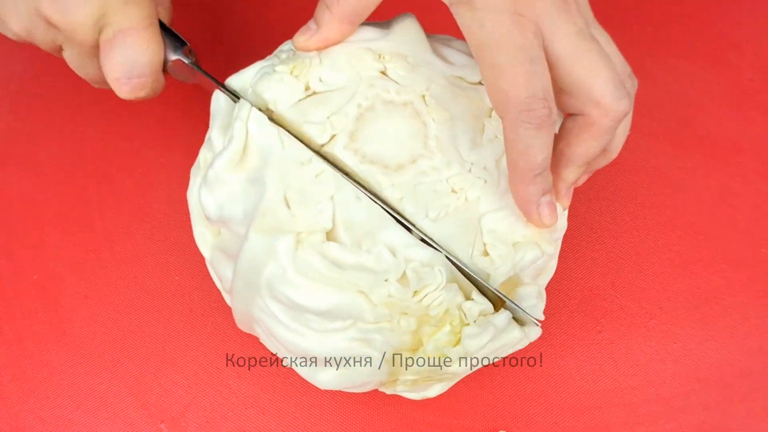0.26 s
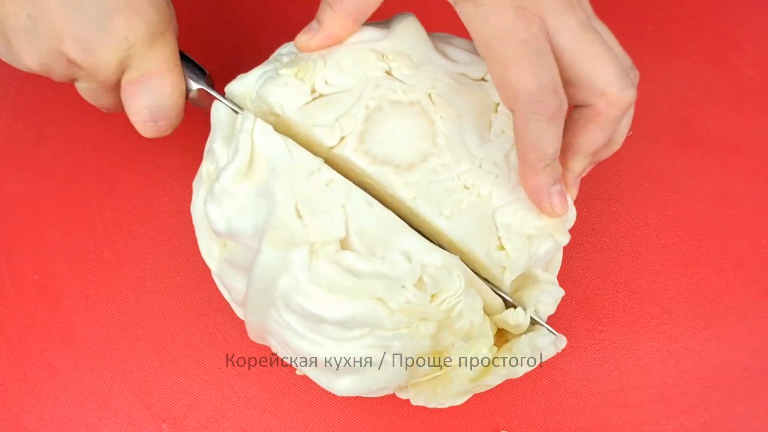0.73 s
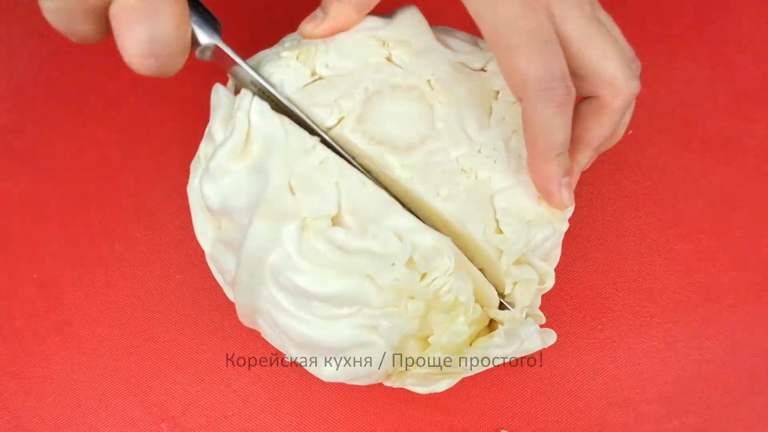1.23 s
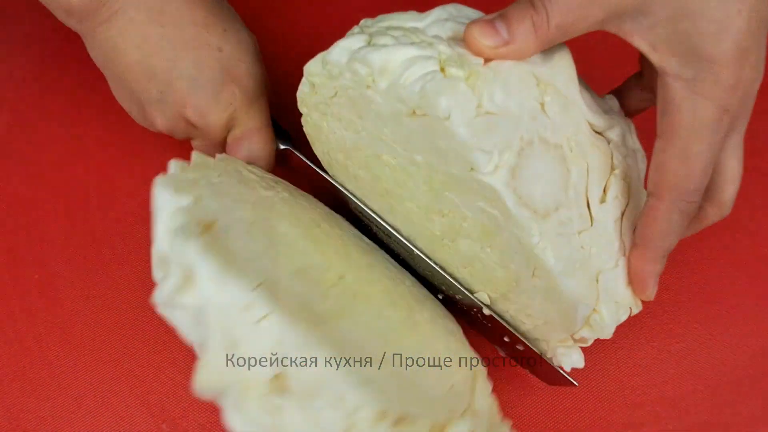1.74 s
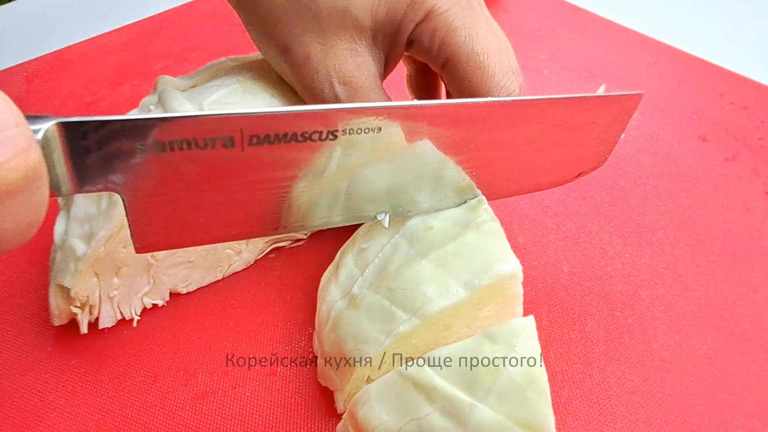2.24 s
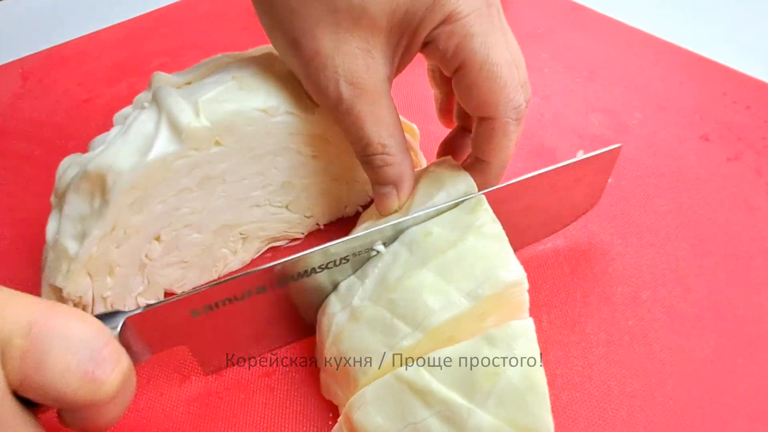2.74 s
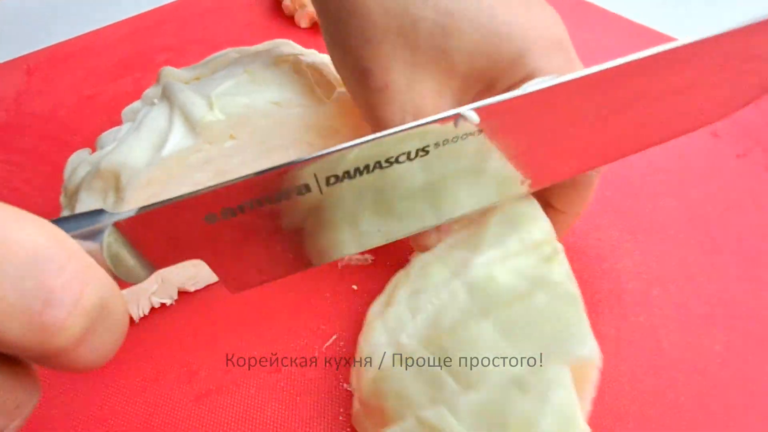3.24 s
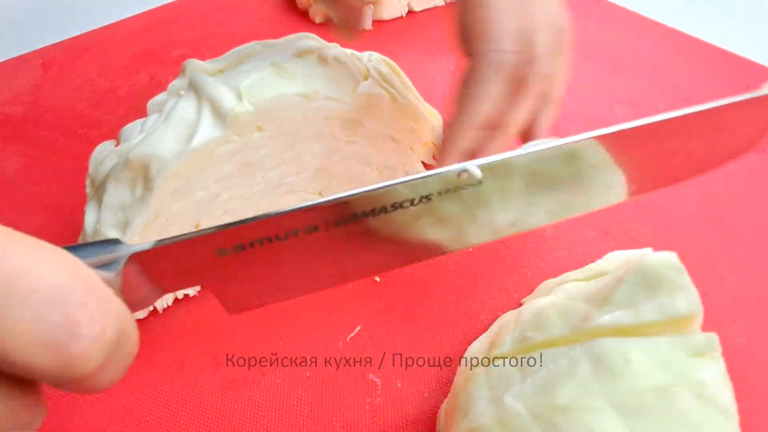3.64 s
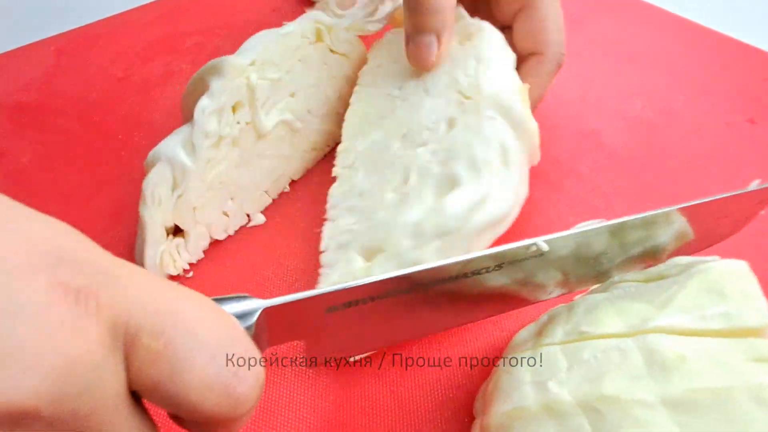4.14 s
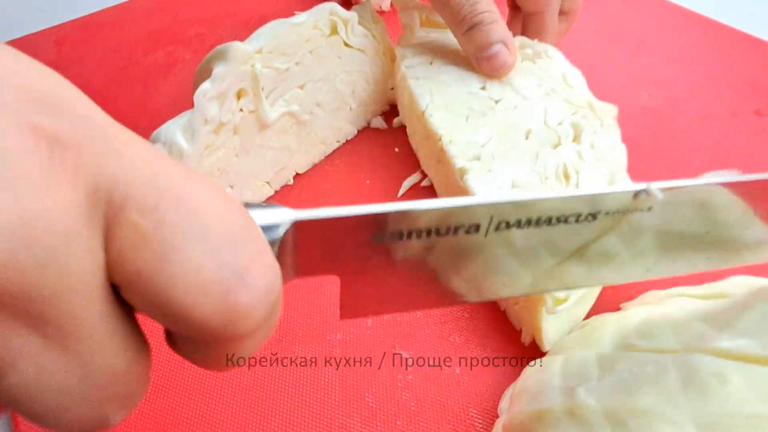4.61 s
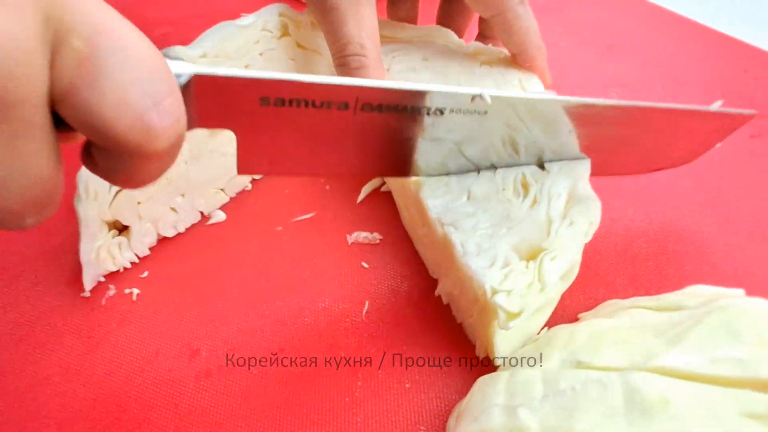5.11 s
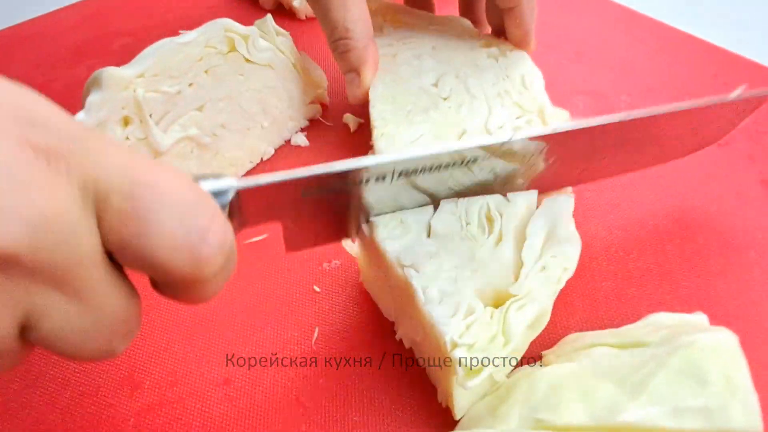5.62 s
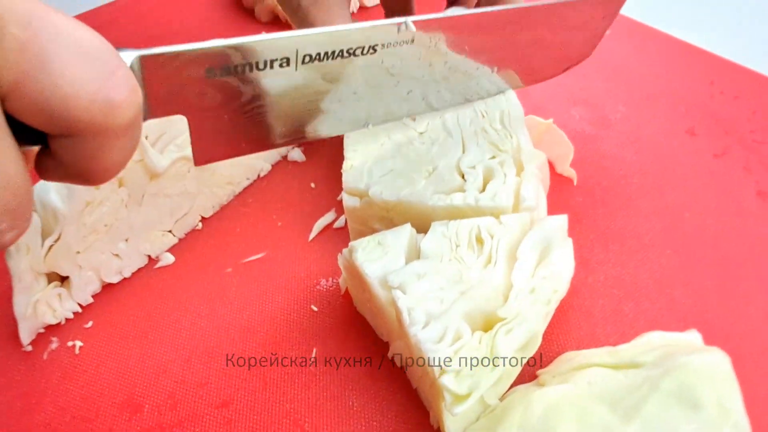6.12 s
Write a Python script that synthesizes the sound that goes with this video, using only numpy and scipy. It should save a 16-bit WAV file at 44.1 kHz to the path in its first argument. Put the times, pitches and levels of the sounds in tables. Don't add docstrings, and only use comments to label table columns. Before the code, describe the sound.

Fast rasping saw strokes tear dense leaves, with popping ribs and dry ticks, ending in a heavy chop and board knock. A brief drop to room hush leads to another crisp cut and landing. Faint sliding, rubbing and small fibre flicks follow, then a long crunchy push, two board hits and a last chop. Close stereo pickup, small dry kitchen, low hum beneath.

```python
import sys
import numpy as np
from scipy import signal
from scipy.fft import rfft, irfft, next_fast_len
from scipy.io import wavfile
from scipy.ndimage import uniform_filter1d

SR = 44100
rng = np.random.default_rng(int(sys.argv[2]) if len(sys.argv) > 2 else 0)


def master_out(mix):
    frames = np.transpose(np.atleast_2d(mix))
    ceiling = np.clip(frames, -1, 1)
    pcm = np.round(ceiling * 32767).astype(np.int16)
    wavfile.write(sys.argv[1], SR, pcm)


def decibels_to_gain(level_db):
    exponent = np.asarray(level_db, float) / 20
    return 10 ** exponent


N = 280917

# start in seconds,
# end in seconds, tearing at the start in dB, tearing at the end in dB, counter shake in dB above the tearing.
SAWING = [
    (0.0, 0.03, -28.5, -43, 3.5),
    (0.165, 0.239, -28.5, -38.5, 8),
    (0.312, 0.403, -30.5, -39, 8.5),
    (0.447, 0.495, -42.5, -32.5, 4.5),
    (0.523, 0.589, -24, -34.5, 2),
    (0.683, 0.754, -31.5, -26.5, 6),
    (0.858, 0.918, -35.5, -28.5, -3.5),
]
CUTS = [
    (1.059, 1.101, -39.5, -25, -6),
    (1.114, 1.183, -24, -48, -11),
    (1.532, 1.691, -44, -15, -10.5),
    (2.295, 2.436, -50.5, -35.5, 14),
    (2.545, 2.581, -42.5, -20.5, -2),
    (5.045, 5.19, -48, -22.5, 3.5),
    (5.202, 5.303, -24, -35.5, 4),
    (5.284, 5.401, -33.5, -32.5, 5.5),
    (6.215, 6.352, -40, -26, 7),
]
SETTLING = [
    (1.169, 1.247, -36, -48.5, -9.5),
    (1.705, 1.847, -33.5, -54, 8),
    (2.577, 2.681, -44.5, -35.5, -16.5),
    (2.69, 2.755, -42.5, -33.5, -2.5),
    (5.407, 5.594, -41.5, -40, -5),
    (6.36, 6.382, -40, -31.5, 4),
]
SLIDES = [(1.243, 1.487, -51.5, -39.5, -7.5), (1.884, 2.043, -49.5, -49, 8), (2.032, 2.168, -56, -48, 2.5),
          (2.801, 2.901, -51.5, -71.5, 9), (2.913, 3.027, -52, -62.5, 1), (3.043, 3.14, -70, -67.5, -6),
          (3.937, 4.078, -54, -42.5, 5.5), (4.135, 4.207, -39.5, -35.5, -4.5),
          (4.254, 4.378, -53, -43, -6.5), (4.412, 4.619, -47, -32, -0.5), (4.784, 4.852, -47, -56.5, -1.5),
          (4.938, 5.017, -62.5, -69.5, 22.5), (5.62, 5.7, -44, -57.5, -3), (5.703, 5.791, -51.5, -49, -3.5),
          (5.839, 5.859, -41, -50.5, -3), (6.022, 6.125, -68.5, -75, 11), (6.154, 6.185, -68.5, -55.5, -7)]
DRAGS = [
    (0.073, 1.08, -52, -48.5, -8.5),
    (2.447, 2.54, -46.5, -53, 5.5),
    (3.166, 3.435, -50.5, -44.5, -9),
    (3.445, 3.555, -73, -69.5, 8),
    (3.795, 3.9, -58, -50, 0),
]
# bite in dB/s, let-go in dB/s, leaf body in dB, fine fizz in dB, upper counter modes in dB.
SAW_KIND, CUT_KIND = (881, 331, -0.5, -13.5, -13), (1194, 901.5, -3, -12, -3)
SETTLE_KIND, SLIDE_KIND = (1496.5, 433.5, 1.5, -14, 6), (1200, 333.5, -7, -13, -4.5)
DRAG_KIND = (1199, 349, -1, -15.5, 1)
GRAIN_DB = (-2.5, -3.9, -6, -7, -16)

# frequency in Hz, level in dB per Hz.
CRUNCH = [(180, -61.5), (300, -9), (536, -11), (602, -4), (853, -3), (990, -6), (1310, -1.5), (1660, 0),
          (3730, 3), (4950, -3.5), (6560, -8.5), (8990, -26), (12100, -21.5), (15800, -25.5)]
# frequency in Hz, likeness from 0 to 1.
LIKENESS = [(100, 0.68), (300, 0.62), (600, 0.77), (1200, 0.14), (16000, 0.11)]
NEARER_BODY_DB, NEARER_FIZZ_DB = -3, 4
PATCH_DB, PATCH_HZ = 3.0, 27.95
SPLICE_S = (2.172, 2.268)

# start in seconds, peak in dB, pitch of the pop in Hz.
SNAPS = [(0.021, -23, 4000), (0.1439, -17.5, 1150), (0.2205, -18.5, 2250), (0.3093, -22.5, 1370),
         (0.3292, -12.5, 626), (0.386, -18.5, 910), (0.472, -26, 3700), (0.5005, -15, 840),
         (0.6646, -19, 1340), (0.7356, -15.5, 1380), (0.861, -15, 1230), (1.089, -16, 2660),
         (1.3272, -26, 1490), (1.548, -27, 1060), (1.6734, -17.5, 844), (1.796, -27.5, 736),
         (2.3007, -30, 3250), (2.371, -18.5, 2960), (2.4023, -21.5, 3140), (2.4225, -19, 3645),
         (2.5668, -26, 1157), (3.7881, -43, 6100), (4.0013, -37, 3470), (4.234, -27, 2150),
         (4.2921, -34.5, 1740), (4.4733, -26.5, 1100), (5.056, -31.5, 6560), (5.3727, -31, 1480),
         (5.3925, -14, 1854), (6.324, -20.5, 3180)]
# start in seconds, peak in dB, pitch in Hz.
RIPS = [(0.3585, -13.5, 740), (0.683, -15.5, 1340), (1.473, -18, 1220), (1.5926, -22, 890),
        (1.918, -36, 920), (1.9684, -29.5, 814), (2.151, -36.5, 1550), (2.7345, -32, 1326),
        (2.879, -44, 3380), (2.9247, -45.5, 3600), (3.9153, -33.5, 2490), (4.313, -36.5, 3180),
        (4.401, -28, 3700), (4.9348, -28, 6200), (5.0836, -37, 1420), (5.1098, -27, 3080),
        (5.1493, -21.5, 3170), (5.2705, -25.5, 1180), (5.3153, -23.5, 860), (5.4954, -25.5, 745),
        (5.5657, -27.5, 3700), (5.7099, -39, 3960), (6.0174, -41.5, 3650), (6.2193, -20, 3730),
        (6.2781, -23, 4950)]
# start in seconds, peak in dB, pitch in Hz.
TICKS = [(0.1247, -24, 6500), (0.3212, -12.5, 3820), (0.7188, -13, 6420), (0.76, -14, 1600),
         (0.968, -23.5, 2490), (1.2376, -35, 3870), (1.304, -26, 5390), (1.8945, -50, 832),
         (2.11, -34.5, 3050), (2.3332, -22.5, 6500), (2.513, -37, 3190), (2.6766, -22, 794),
         (3.0085, -35, 2475), (3.5024, -46.5, 3240), (3.5433, -52, 1803), (3.5853, -56, 4430),
         (3.8482, -34.5, 2170), (3.945, -35, 6000), (3.97, -36, 4290), (4.68, -36, 6430),
         (4.7366, -44, 2460), (4.7541, -46.5, 2880), (4.777, -45, 2670), (4.9086, -43, 6560),
         (5.4119, -10.5, 2430), (5.4186, -7, 3900), (5.608, -26.5, 3340)]
SNAP_T60_S, RIP_T60_S, TICK_T60_S = 0.051, 0.091, 0.028
BREAK_FIZZ_DB_PER_OCTAVE = 1.5

# start in seconds, peak in dB, pitch in Hz, left minus right in dB.
CRACKS = [(0.146, -16.5, 1320, 2), (0.198, -17, 1120, 6), (0.223, -20, 756, -0.5), (0.31, -30, 1460, -1.5),
          (0.331, -19, 613, 1), (0.359, -28.5, 918, -2), (0.386, -13, 830, 2), (0.501, -16, 770, 0.5),
          (0.665, -19, 1364, 1.5), (0.684, -24.5, 1320, 3.5), (0.734, -26, 1327, 2.5),
          (0.861, -23, 1270, 2.0), (1.057, -35, 850, -2), (1.089, -7.5, 1850, 2), (1.326, -40, 1460, -2),
          (1.476, -31, 1520, 4), (1.482, -23, 1200, -3), (1.538, -24, 1790, 2.0), (1.55, -30, 1050, -1),
          (1.593, -14.5, 920, 6), (1.619, -15, 800, -1), (1.673, -13, 1500, 0.5), (1.699, -5, 788, 1),
          (1.918, -41, 937, 2.5), (2.301, -31, 633, 0.5), (2.37, -19, 700, 2), (2.552, -26, 1407, 6),
          (2.564, -17, 1690, -0.5), (2.588, -8.5, 634, 1.5), (4.174, -26, 1450, -2), (4.474, -21, 1104, -5),
          (4.934, -37, 1305, -5), (5.145, -19, 606, -6), (5.222, -14, 575, 6), (5.27, -22.5, 506, 1.5),
          (5.393, -18, 1480, -1.5), (5.427, -4.5, 630, -4.5), (6.216, -37.5, 2120, 1),
          (6.221, -19.5, 1600, -7), (6.349, -26, 620, -5)]
CRACK_T60_S, CRACK_WIDTH, CRACK_DB = 0.022, 1.3, -5
# start in seconds, peak in dB, pitch in Hz, left minus right in dB.
FLICKS = [(0.0714, -32, 5930, -1.5), (0.2214, -18, 3400, 0.0), (0.3002, -19, 3230, 4),
          (0.3864, -22, 2500, -4), (0.4054, -36, 2890, -2.0), (0.4618, -17, 3850, 1),
          (0.7208, -7, 6420, -9), (0.7357, 0, 3310, -3), (0.8379, -15, 2660, -4), (1.0719, -19, 2950, -3),
          (1.1662, -22, 3890, -1.0), (1.2835, -25, 3280, -1.0), (1.5314, -22, 2710, -0.5),
          (1.5933, -30, 2680, -0.5), (1.8726, -36, 4120, 0.5), (1.9784, -18, 2600, 2),
          (2.0283, -30, 2920, -6), (2.0424, -23, 3310, -3), (2.0774, -23, 2590, -2.0),
          (2.1306, -44.5, 2790, 1), (2.3775, -9, 2680, 8), (2.544, -18, 6570, 4), (2.6238, -26, 2670, 1.5),
          (2.8114, -36, 5410, -2), (2.8324, -49, 3400, 0), (2.9704, -39.5, 3500, -2),
          (3.0524, -42, 7740, 5.5), (3.0754, -45, 6600, 9), (3.1054, -38, 5580, 12), (3.1128, -44, 5990, 6),
          (3.8014, -52, 6190, 0), (3.8816, -43, 3920, 1.5), (4.0013, -21.5, 2630, 17),
          (4.0357, -22, 2650, 6), (4.0622, -37, 4510, 3.0), (4.1834, -18, 3450, 12),
          (4.3271, -33.5, 3300, 13), (5.006, -42.5, 6640, 2.5), (5.1744, -20, 3620, 1),
          (5.5144, -17.5, 3760, 14), (5.5344, -33, 3090, 1), (5.6294, -23, 3570, 3)]
FLICK_T60_S, FLICK_WIDTH, FLICK_DB = 0.0077, 2.6, -5
# start in seconds, peak in dB, pitch in Hz.
SPARKS = [(0.3132, -29, 11300), (0.3292, -16, 12300), (0.3577, -16, 12000), (0.3635, -25, 12200),
          (0.6888, -22, 12000), (1.797, -35, 13000), (2.2727, -46, 11000), (2.4244, -26, 13900),
          (2.6788, -31, 14000), (3.9429, -34, 14300), (4.49, -30, 14700), (4.564, -34, 14700),
          (5.1133, -25, 14200), (5.4954, -30, 13000)]
SPARK_T60_S, SPARK_WIDTH, SPARK_PAN_DB = 0.023, 1.2, -4
# start in seconds, peak in dB, pitch in Hz, left minus right in dB.
SHUDDERS = [
    (1.7, -19.5, 480, 2),
    (1.741, -32.5, 750, 1.5),
    (2.592, -17.5, 469, 1.5),
    (2.625, -21, 270, 2),
    (5.43, -16, 503, -3),
    (5.226, -22, 326, 1.5),
]
SHUDDER_T60_S, SHUDDER_WIDTH = 0.27, 1.55
PUFF_RISE_S = 0.0012

# frequency in Hz, width in Hz, level in dB.
HOLLOWS = [(1900, 1100, -8.5), (3220, 850, -3), (4170, 400, -8), (6345, 600, -11), (9470, 1200, -9.5),
           (11500, 900, -14), (14900, 500, -19.5)]
HOLLOW_WANDER_DB, HOLLOW_WANDER_HZ = 5.5, 5.5
# start in seconds, end in seconds, dB at the start, dB at the end.
RUBS = [
    (3.17, 3.45, -74, -66),
    (4.14, 4.24, -58, -68),
    (4.47, 4.66, -56, -58),
    (4.94, 5.065, -82, -49),
]
RUB_KIND = (600, 470)
# frequency in Hz, width in Hz, level in dB.
SINGING = [(3425, 120, -8), (6560, 90, 2.5), (7230, 90, -14), (12170, 120, -5.5), (13940, 110, -7),
           (14900, 80, -3)]

# start in seconds, board level in dB, contact cut-off in Hz, slap in dB, slap pitch in Hz.
KNOCKS = [
    (0.3902, -35.5, 1190, -10, 800),
    (1.6958, -0.5, 775, 8, 780),
    (1.7007, -10.5, 800, 5, 460),
    (2.5889, -0.5, 1287, -7, 640),
    (4.475, -31, 1545, -10, 1030),
    (5.223, -9, 900, -11, 423),
    (5.4276, -2.5, 876, 1, 678),
    (6.35, -3.5, 796, 3, 603),
]
# frequency in Hz, level in dB, time to die by 60 dB in seconds.
BOARD = [(149, -13, .15), (263, -6, 0.083), (320, 0.5, 0.1), (402, -14.5, 0.16), (460.5, -1.5, 0.087),
         (521, -2.5, 0.079), (600, -1.5, 0.09), (616, -8.5, 0.051), (788, -1.5, 0.055), (872, -4.5, 0.11),
         (968, -6, 0.082), (1120, 1, 0.07), (1340, -6, .09)]
# start in seconds, level in dB.
BLADE_TOUCH = [
    (2.273, -86),
    (4.475, -64),
    (4.936, -61),
]
# frequency in Hz, level in dB, time to die by 60 dB in seconds.
BLADE = [(4260, -23, .2), (6800, -13, 0.26), (6500, 18, 0.22), (12450, -17, .17), (13370, -10, .1)]

# frequency in Hz, width in Hz, level in dB.
COUNTER_LOW = [(57.3, 14, -8), (78, 18, 5.5), (95, 77, 7)]
# frequency in Hz, width in Hz, level in dB.
COUNTER_HIGH = [(151.2, 19, -11.5), (177, 52, 0.5), (300, 200, -8)]
SHAKE_LAG_S, SHAKE_RATE_SHARE = 0.0081, 0.75
# start
# in seconds, peak in dB, pitch in Hz, time to die by 60 dB in seconds.
BUMPS = [(0.163, -34, 98.5, 0.21), (0.31, -24, 95, 0.029), (0.36, -19.5, 95, 0.071),
         (0.675, -16.5, 93, 0.074), (0.742, -17.5, 82.6, 0.016), (0.771, -29, 95, 0.1),
         (0.862, -22.5, 89, 0.049), (0.906, -20.5, 95, 0.074), (1.599, -18.5, 75, 0.057),
         (1.697, -13, 128, 0.048), (1.768, -14, 83.4, 0.091), (1.925, -21, 78, 0.06),
         (1.961, -19.5, 78, 0.094), (2.56, -20.5, 88, 0.036), (2.773, -27, 73.5, 0.065),
         (3.145, -42, 82, 0.13), (3.544, -42, 82.2, 0.052), (3.794, -35, 79.4, 0.045),
         (3.94, -37, 75, 0.089), (4.057, -22.5, 91, 0.018), (4.076, -25, 73, 0.026), (4.6, -36, 89, 0.068),
         (4.941, -53, 86, 0.17), (5.125, -19, 84.4, 0.1), (5.17, -19.5, 75, 0.032),
         (5.345, -26, 82.5, 0.23), (5.579, -33.5, 81, 0.16), (5.859, -42, 76, 0.059),
         (6.03, -41.5, 69, 0.046), (6.236, -24.5, 95, 0.049),
         (1.651, -20.5, 85.3, 0.072), (3.189, -43.5, 166, 0.059), (3.429, -51, 377, 0.056),
          (4.123, -34.5, 186, 0.14), (4.334, -46, 295, 0.032), (4.575, -30.5, 183, 0.088),
          (4.894, -53.5, 207, 0.084), (5.126, -31, 320, 0.072), (5.33, -28.5, 250, 0.16),
          (5.43, -22, 191.5, 0.12), (6.292, -24.5, 97.3, 0.07), (1.66, -24.5, 410, .05)]

KITCHEN_T60_S, WALL_CUT_HZ = 0.2, 2100
# frequency in Hz, level in dB per Hz.
HUSH = [(18, -24), (30, -15.5), (91, 6.5), (124, -7), (200, 2), (440, -18), (589, -26), (971, -37.5),
        (6820, -32.5), (16300, -31)]
HUSH_DB = -68.5
HUM = (81, -72.5)
# frequency in Hz, level in dB.
WHINE = [(199.2, -73), (322, -85), (393, -88), (592, -91)]
BASS_CUT_HZ, CUTOFF_HZ = 42, 16080


def rms_one(x):
    return x / np.sqrt(np.mean(x ** 2) + 1e-20)


def movements():
    tables = (SAWING, CUTS, SETTLING, SLIDES, DRAGS)
    return zip(tables, (SAW_KIND, CUT_KIND, SETTLE_KIND, SLIDE_KIND, DRAG_KIND))


def in_time(rows, kind, lag_s=0, rate_share=1):
    start, end, first_db, last_db = np.transpose(rows)[:4, :, None]
    t = np.arange(0, N + 32, 32) / SR - lag_s
    hold = first_db + (last_db - first_db) * np.clip((t - start) / (end - start), 0, 1)
    bite, let_go = kind[0] * np.maximum(start - t, 0), kind[1] * np.maximum(t - end, 0)
    return hold - rate_share * (bite + let_go)


def summed(levels_db):
    power = sum(np.sum(decibels_to_gain(db) ** 2, axis=0) for db in levels_db)
    total_db = 10 * np.log10(power + 1e-14)
    return np.interp(np.arange(N) / 32, np.arange(len(total_db)), total_db)


def tearing_db(trait=None):
    return summed(in_time(rows, kind) + (0 if trait is None else kind[trait]) for rows, kind in movements())


def at_hz(points, hz):
    return np.interp(np.log(hz), np.log(np.array(points)[:, 0]), np.array(points)[:, 1])


def shaped(x, gain):
    return irfft(rfft(x) * gain(np.fft.rfftfreq(N, 1 / SR) + 1), N)


def pair_noise(spectrum):
    mid, side = rng.standard_normal((2, N))
    alike = lambda hz: np.clip(at_hz(LIKENESS, hz), 0, 1)
    mid = shaped(mid, lambda hz: decibels_to_gain(at_hz(spectrum, hz)) * np.sqrt(1 + alike(hz)))
    side = shaped(side, lambda hz: decibels_to_gain(at_hz(spectrum, hz)) * np.sqrt(1 - alike(hz)))
    return rms_one(np.array([mid + side, mid - side]))


def filtered(x, order, cut_hz, kind):
    return signal.sosfilt(signal.butter(order, cut_hz, kind, fs=SR, output="sos"), x)


def band(x, low_hz, high_hz):
    return filtered(x, 3, [low_hz, high_hz], "band")


def fade(clicks, t60):
    return signal.lfilter([1], [1, -decibels_to_gain(-60 / (t60 * SR))], clicks + 1e-18)


def ring(clicks, hz, t60):
    r, w = decibels_to_gain(-60 / (t60 * SR)), 2 * np.pi * hz / SR
    return signal.lfilter([0, np.sin(w)], [1, -2 * r * np.cos(w), r * r], clicks + 1e-18)


def later(x, count):
    return np.concatenate([np.zeros(count), x[:N - count]])


def burst_sizes(spread_db):
    return decibels_to_gain(spread_db * np.minimum(rng.exponential(1, N), 3.5))


def leaves():
    crunch_db = tearing_db()
    jumped = np.arange(N) / SR > SPLICE_S[0]
    body_db = tearing_db(trait=2) - crunch_db + NEARER_BODY_DB * jumped
    fizz_db = tearing_db(trait=3) - crunch_db + NEARER_FIZZ_DB * jumped
    noise = pair_noise(CRUNCH)
    body = rms_one(band(noise, 270, 1500))
    crunch = rms_one(band(noise, 1500, 7500))
    fizz = rms_one(band(noise, 7500, 19000)) * decibels_to_gain([[-.9], [.9]])
    grain = clumps(per_s=260, spread_db=2.8, t60=0.022, steady=0.85)
    fine = clumps(per_s=2000, spread_db=3.0, t60=0.0015, steady=1.2)
    hiss = decibels_to_gain(body_db) * body + fine * (crunch + decibels_to_gain(fizz_db + 7.5) * fizz)
    pockets = decibels_to_gain(-1.5) * pops(per_s=1400, spread_db=4.5, cycles=14.0)
    grain_db = summed(in_time(rows, kind) + db for (rows, kind), db in zip(movements(), GRAIN_DB))
    clumped = np.minimum(decibels_to_gain(grain_db - crunch_db), 1)
    out = decibels_to_gain(crunch_db - 4.5) * (1 + clumped * (grain - 1)) * (hiss + clumped * pockets)
    add_breaks(out, body, crunch, fizz, fizz_db, fine)
    return out


def clumps(per_s, spread_db, t60, steady):
    sizes = burst_sizes(spread_db)
    bursts = rms_one(fade(sizes * (rng.random(N) < per_s / SR), t60))
    return rms_one(steady + bursts)


def pops(per_s, spread_db, cycles):
    sizes = burst_sizes(spread_db) * rng.choice([-1, 1], N)
    clicks = sizes * (rng.random(N) < per_s / SR)
    out, dealt = np.zeros((2, N)), rng.integers(0, 24, N)
    for k, hz in enumerate(np.geomspace(600, 7200, 24)):
        rings = decibels_to_gain(at_hz(CRUNCH, hz)) * np.sqrt(hz) * rms_one(ring(clicks * (dealt == k), hz, cycles / hz))
        out += [later(rings, count=k * 5 % 9), later(rings, count=6 + k * 7 % 11)]
    return rms_one(out)


def add_breaks(out, body, crunch, fizz, fizz_db, fine):
    t = np.arange(3500) / SR
    for rows, t60 in ((SNAPS, SNAP_T60_S), (RIPS, RIP_T60_S), (TICKS, TICK_T60_S)):
        ring_out = decibels_to_gain(-60 * np.maximum(t - 0.042 * t60, 0) / max(t60, .004))
        rip = (1 - np.exp(-t / 0.00069)) * ring_out
        for s, peak_db, hz in rows:
            part = slice(round(s * SR), round(s * SR) + len(t))
            tone = filtered(body[:, part] + crunch[:, part], 1, [hz / 1.2, hz * 1.2], "band")
            bright_db = fizz_db[part] + 11.5 + BREAK_FIZZ_DB_PER_OCTAVE * np.log2(hz / 3000)
            colour = decibels_to_gain(-8.0) * body[:, part] + crunch[:, part]
            colour = colour + decibels_to_gain(bright_db) * fizz[:, part] + decibels_to_gain(3.0) * rms_one(tone)
            out[:, part] += decibels_to_gain(peak_db - 16.0) * rip[:colour.shape[1]] * fine[part] * colour


def patched(x):
    hz, spectrum = np.fft.rfftfreq(N, 1 / SR), rfft(x)
    place = np.clip(2 * np.log2((hz + 1) / 700), 0, 9)
    out, steps = np.zeros((2, N)), np.arange(N) / SR * 2 * PATCH_HZ
    for k, knots in enumerate(rng.standard_normal((10, 600))):
        flicker_db = PATCH_DB * np.interp(steps, np.arange(600), knots)
        out += decibels_to_gain(flicker_db) * irfft(spectrum * np.maximum(1 - np.abs(place - k), 0), N)
    return out


def flicks(rows, t60, width, level_db, count=1500):
    out, t = np.zeros((2, N + SR)), np.arange(count) / SR
    puffs = rng.standard_normal((len(rows), 2, len(t)))
    shape = (1 - np.exp(-t / PUFF_RISE_S)) * decibels_to_gain(-60 * t / t60)
    for (s, peak_db, hz, pan_db), puff in zip(rows, puffs):
        alike = np.clip(at_hz(LIKENESS, hz), 0, 1)
        puff = np.sqrt(1 + alike) * puff[0] + np.sqrt(1 - alike) * puff[1] * [[1], [-1]]
        edges = [hz / max(width, 1.05), min(hz * max(width, 1.05), 19000)]
        puff = rms_one(filtered(puff, 2, edges, "band"))
        i = round(s * SR)
        sides = decibels_to_gain(peak_db + level_db + pan_db * np.array([[.5], [-.5]]))
        out[:, i:i + len(t)] += sides * puff * shape
    return out[:, :N]


def rubbing():
    hollows = decibels_to_gain(tearing_db() - 9.5) * resonant(HOLLOWS, HOLLOW_WANDER_DB)
    return hollows + decibels_to_gain(summed([in_time(RUBS, RUB_KIND)])) * resonant(SINGING, wander_db=1.0)


def resonant(peaks, wander_db):
    out = np.zeros((2, N))
    for hz, width, db in peaks:
        knots = rng.standard_normal(400)
        swell = np.interp(np.arange(N) / SR * 2 * HOLLOW_WANDER_HZ, np.arange(400), knots)
        out += decibels_to_gain(db + wander_db * swell) * rms_one(ring(rng.standard_normal((2, N)), hz, 2.2 / width))
    return out


def board():
    out, t = np.zeros(N), np.arange(int(.45 * SR)) / SR
    chance = rng.standard_normal((len(KNOCKS), len(BOARD), 2))
    rattles = rng.standard_normal((len(KNOCKS), len(t)))
    for (s, peak_db, cut_hz, slap_db, slap_hz), own, rattle in zip(KNOCKS, chance, rattles):
        push = decibels_to_gain(-30.5) * rattle * decibels_to_gain(-60 * t / 0.32)
        push[0] -= 1
        push = filtered(push, 2, cut_hz, "low")
        knock = 0
        for (hz, db, t60), (strength, detune) in zip(BOARD, own):
            pair = ring(push, hz * (1 + .02 * detune), t60) + ring(push, hz * 1.055, t60)
            knock = knock + decibels_to_gain(db + 2.5 * strength) * pair
        slap = -np.sin(2 * np.pi * slap_hz * t) * (1 - np.exp(-t / .0003)) * decibels_to_gain(-60 * t * slap_hz / 13)
        buzz = rms_one(band(rattle, 650, 1700)) * (1 - np.exp(-t / .004)) * decibels_to_gain(-60 * t / .3)
        landing = decibels_to_gain(peak_db - 28.0) * buzz + decibels_to_gain(peak_db - 20.0) * knock + decibels_to_gain(slap_db - 9.5) * slap
        i = round(s * SR)
        out[i:i + len(t)] += landing[:N - i]
    return out


def blade():
    clicks = np.zeros(N)
    for s, db in BLADE_TOUCH:
        clicks[round(s * SR)] = decibels_to_gain(db)
    return sum(decibels_to_gain(db) * ring(clicks, hz, t60) for hz, db, t60 in BLADE)


def counter():
    shakes = []
    for rows, kind in movements():
        shake_db = in_time(rows, kind, SHAKE_LAG_S, SHAKE_RATE_SHARE) + np.array(rows)[:, 4:]
        shakes.append((shake_db, kind[4]))
    level_db = summed(db for db, upper in shakes)
    upper_db = summed(db + upper for db, upper in shakes) - level_db
    jolts = rng.standard_normal(N)
    low = evened(band(counter_modes(jolts, COUNTER_LOW), 40, 125), share=.6)
    high = evened(band(counter_modes(jolts, COUNTER_HIGH), 110, 380), share=.6)
    return decibels_to_gain(level_db - 4.0) * (low + decibels_to_gain(upper_db - 1.5) * high)


def counter_modes(jolts, modes):
    return rms_one(sum(decibels_to_gain(db) * rms_one(ring(jolts, hz, 2.2 / width)) for hz, width, db in modes))


def evened(x, share):
    swing = np.sqrt(uniform_filter1d(x ** 2, size=1300) + 0.15)
    return rms_one(x / swing ** share)


def bumps():
    out, t = np.zeros(N), np.arange(int(.3 * SR)) / SR
    for s, peak_db, hz, t60 in BUMPS:
        swing = np.sin(2 * np.pi * hz * t) * (1 - np.exp(-t * hz / .85)) ** 2 * decibels_to_gain(-60 * t / t60)
        i = round(s * SR)
        out[i:i + len(t)] += decibels_to_gain(peak_db) * swing[:N - i] / np.abs(swing).max()
    return out


def kitchen(x):
    size = next_fast_len(N + SR)
    hz = np.fft.rfftfreq(size, 1 / SR)
    out = np.zeros((2, len(hz)), complex)
    for k, lag_s in enumerate(rng.uniform(.006, .03, 16)):
        wall = decibels_to_gain(-60 * lag_s / KITCHEN_T60_S) / (1 + 1j * hz / WALL_CUT_HZ) ** 0.48
        loop = wall * np.exp(-2j * np.pi * hz * lag_s)
        out[k % 2] += loop / (1 - loop) * (-1) ** (k // 2)
    return irfft(out * rfft(x, size), size)[:, :N]


def room_hush():
    drone = decibels_to_gain(HUM[1]) * rms_one(ring(rng.standard_normal(N), HUM[0], .4))
    drone = drone + sum(decibels_to_gain(db) * rms_one(ring(rng.standard_normal(N), hz, 4.0)) for hz, db in WHINE)
    return decibels_to_gain(HUSH_DB) * pair_noise(HUSH) + drone


def scene():
    torn, struck = leaves(), board() + blade()
    small = flicks(FLICKS, FLICK_T60_S, FLICK_WIDTH, FLICK_DB)
    small = small + flicks(CRACKS, CRACK_T60_S, CRACK_WIDTH, CRACK_DB)
    small = small + flicks([(*row, SPARK_PAN_DB) for row in SPARKS], SPARK_T60_S, SPARK_WIDTH, -4.0)
    small = small + flicks(SHUDDERS, SHUDDER_T60_S, SHUDDER_WIDTH, -5.0, count=12000)
    small = small + rubbing()
    direct = np.array([struck, decibels_to_gain(-1.5) * later(struck, count=9)])
    shake = counter() + bumps()
    shaken = np.array([decibels_to_gain(0.5) * later(shake, count=12), shake])
    echoes = decibels_to_gain(-16) * kitchen(torn[0]) + decibels_to_gain(-19.5) * kitchen(struck)
    action = patched(torn) * decibels_to_gain([[.4], [-.4]]) + small + direct + shaken + echoes
    t = np.arange(N) / SR
    heard = np.clip(np.maximum(SPLICE_S[0] - t, t - SPLICE_S[1]) / 0.0023, 0, 1)
    return heard * action + room_hush()


def top_cut(x):
    return signal.sosfilt(signal.butter(12, 16000, fs=SR, output="sos"), x)


def record(dry):
    x = filtered(dry, 4, BASS_CUT_HZ, "high")
    x = 1.5 * np.tanh(x / 1.5)
    x = signal.sosfilt(signal.cheby2(24, 75, CUTOFF_HZ, fs=SR, output="sos"), x)
    return top_cut(x)


dry = scene()
out = record(dry)
master_out(out)
```